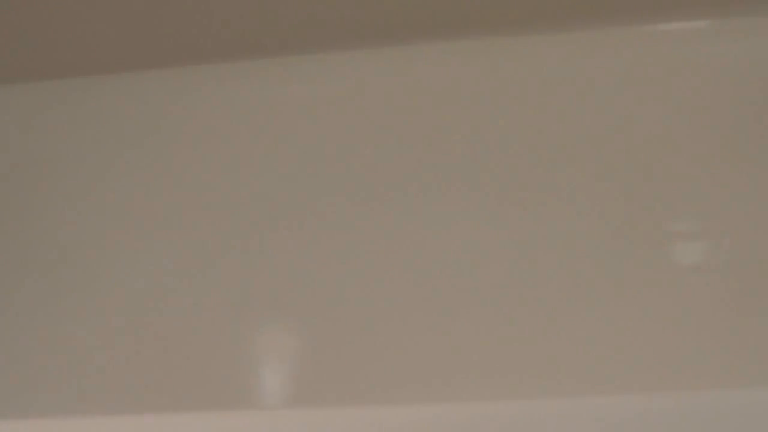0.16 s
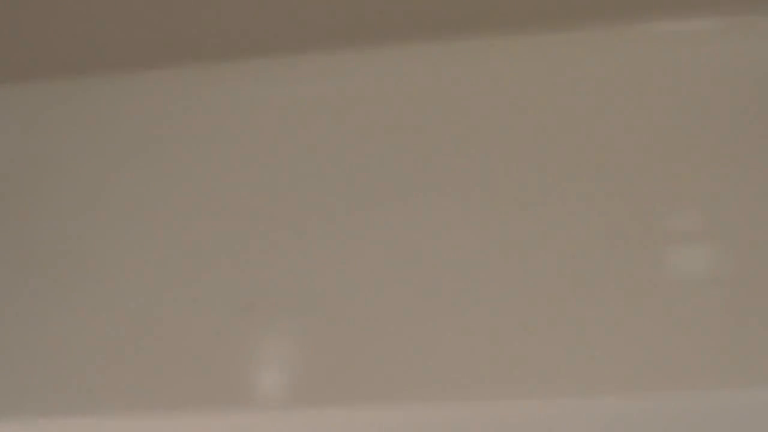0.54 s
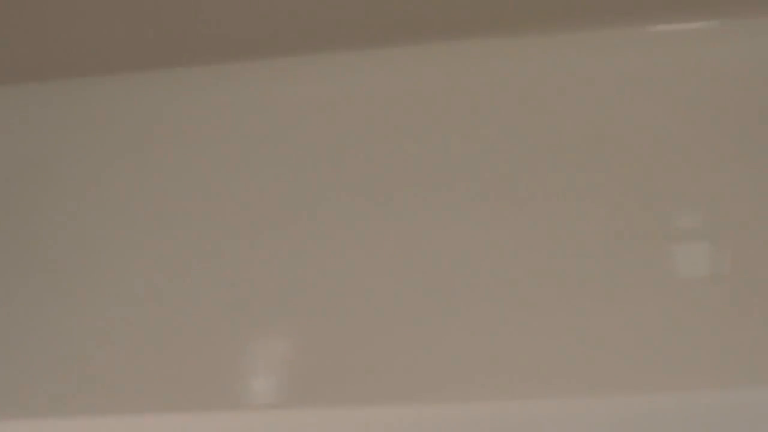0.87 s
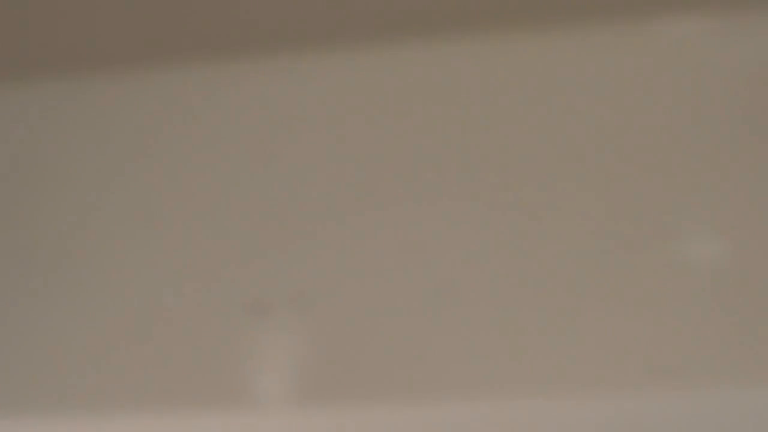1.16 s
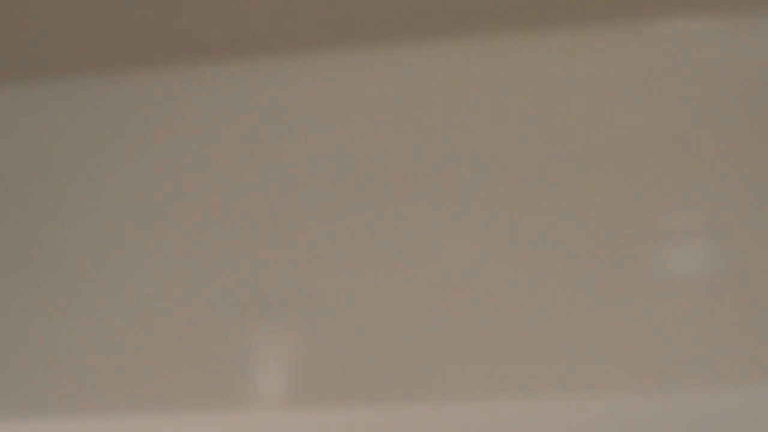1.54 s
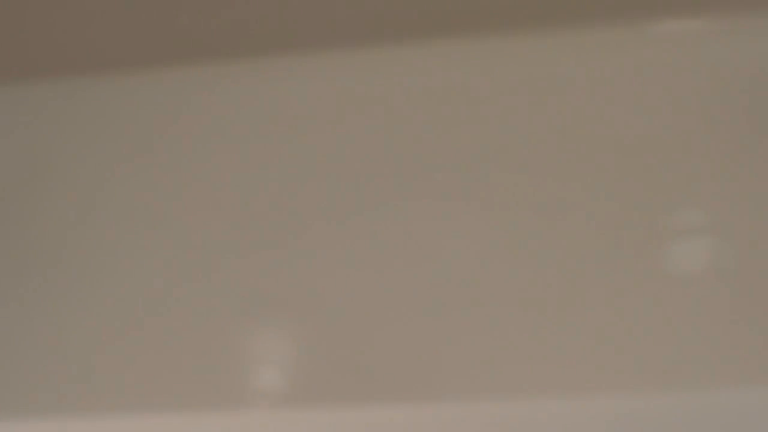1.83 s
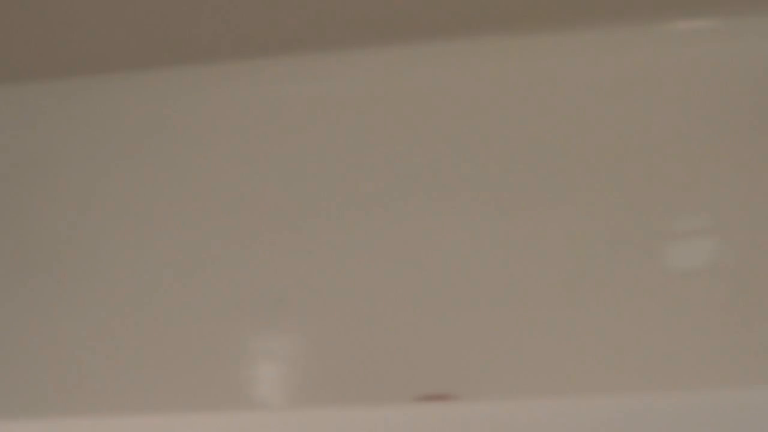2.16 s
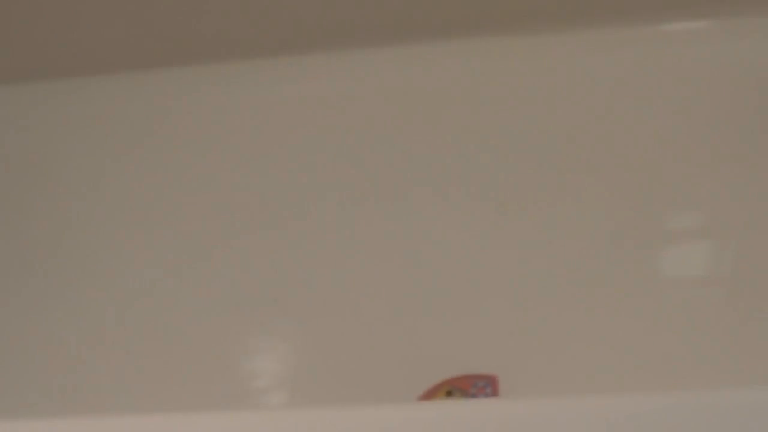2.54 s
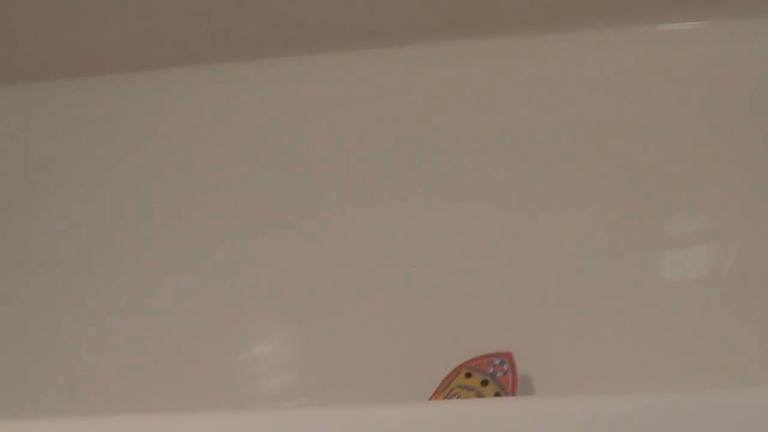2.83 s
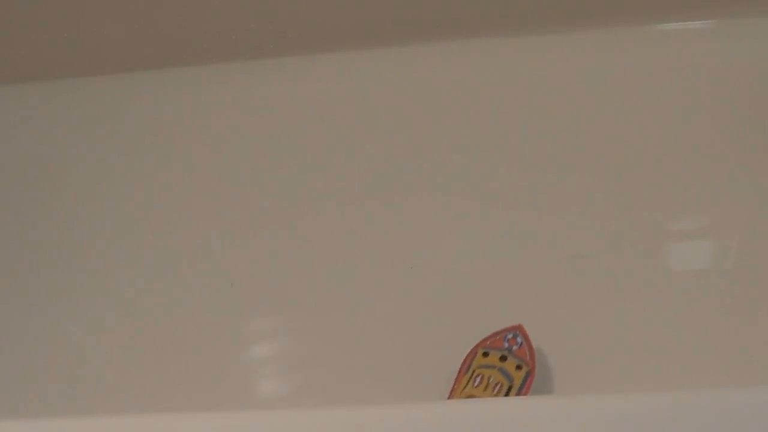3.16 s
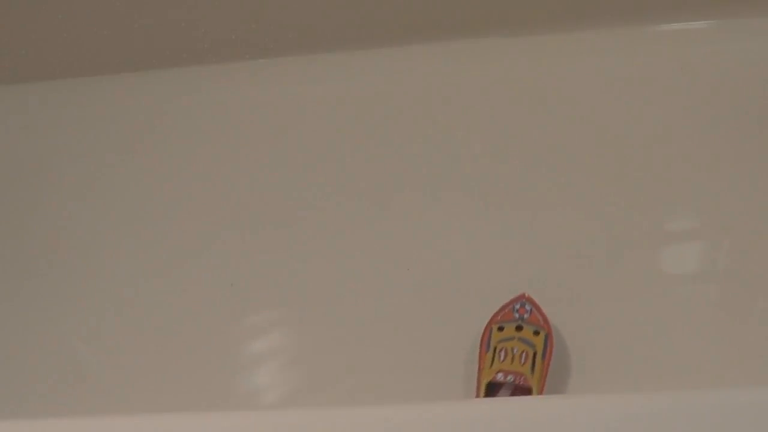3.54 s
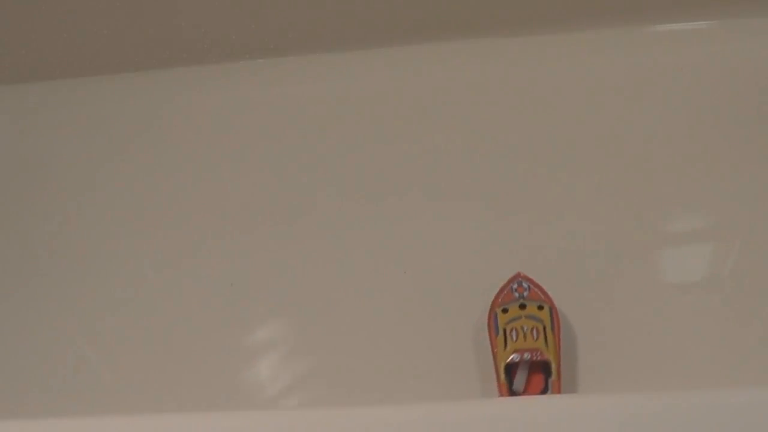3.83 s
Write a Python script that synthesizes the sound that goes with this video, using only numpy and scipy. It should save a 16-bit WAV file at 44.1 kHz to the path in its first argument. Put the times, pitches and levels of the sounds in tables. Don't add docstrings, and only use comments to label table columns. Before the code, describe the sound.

A candle-heated tin toy boat putters with a rapid, even metallic rattle, with occasional harder snaps, in an enamel bathtub. A small tiled room adds short reverberation, low hum, soft hiss and a faint high whine.

```python
import sys
import numpy as np
from scipy import signal
from scipy.fft import rfft, irfft
from scipy.io import wavfile
from scipy.ndimage import uniform_filter1d

SR = 44100
rng = np.random.default_rng(int(sys.argv[2]) if len(sys.argv) > 2 else 0)


def inscribe(sig):
    pcm = np.round(np.clip(np.atleast_2d(sig).T, -1, 1) * 32767)
    wavfile.write(sys.argv[1], SR, pcm.astype(np.int16))


def gain_from_decibels(decibels):
    exponent = np.asarray(decibels, float) / 20
    return 10 ** exponent


N = 176400


def evened(x):
    return x / np.sqrt(np.mean(x ** 2) + 1e-20)


def read(points, hz):
    f, value = np.transpose(points)
    return np.interp(np.log(hz + 1), np.log(f + 1), value)


def colour(x, points):
    hz = np.fft.rfftfreq(len(x), 1 / SR)
    return irfft(rfft(x) * gain_from_decibels(read(points, hz)), len(x))


def add(mix, s, sound):
    at = round(s * SR)
    sound = sound[max(-at, 0):]
    part = mix[max(at, 0):][:len(sound)]
    part += sound[:len(part)]


def knock(t, fall_s):
    rise_s = .0022
    t = np.maximum(t, 0)
    return (1 - np.exp(-t / rise_s)) * np.exp(-t / fall_s)


# f/Hz, level/dB
WHINE_TONES = [(15734.3, -57), (15747.3, -63), (15674.3, -76), (15614.4, -78), (15554.5, -79),
               (15494.5, -80), (15434.6, -80)]


def electric_whine():
    pan_db = .35
    t = np.arange(N) / SR
    tones = sum(gain_from_decibels(db + 1.5) * np.sin(2 * np.pi * hz * t + 3.3 * (hz > 15740))
                for hz, db in WHINE_TONES)
    return tones * gain_from_decibels(pan_db * np.array([[1], [-1]]))


# f/Hz, level/dB (per Hz)
AIR_SPECTRUM = [(20, -4), (60, -12), (250, -3.5), (600, -3.5), (1200, -0.5), (3000, -12), (8000, -22),
                (15500, -30)]
# f/Hz, likeness (-1 to 1)
AIR_COHERENCE = [(60, 0.94), (180, 0.62), (550, 0.47), (1650, 0.88), (4970, 0.43), (15000, 1)]


def air():
    level_db, patch_db = -39, 1.5
    frames, hz = N // 256 + 5, np.fft.rfftfreq(1024, 1 / SR)
    a, b, c, d, patches = rng.standard_normal((frames, 513, 5)).T
    patches = uniform_filter1d(patches, size=12, axis=0)
    patches = evened(uniform_filter1d(patches, size=14, axis=1))
    same = np.clip(read(AIR_COHERENCE, hz), -1, 1)[:, None]
    left = a + 1j * b
    right = same * left + np.sqrt(1 - same ** 2) * (c + 1j * d)
    z = np.array([left, right]) * gain_from_decibels(read(AIR_SPECTRUM, hz)[:, None] + patch_db * patches)
    noise = signal.istft(z, nperseg=1024, noverlap=768)[1][:, :N]
    return gain_from_decibels(level_db) * evened(noise)


# f/Hz, t60/s
ROOM_DECAY = [(300, .3), (1500, .24), (5000, .3), (12000, .2)]


def walls(x):
    same = .5
    taps = rng.standard_normal((3, SR // 3)) * (np.arange(SR // 3) > 200)
    hz, t, z = signal.stft(taps, SR, nperseg=256)
    decay = gain_from_decibels(-60 * t / read(ROOM_DECAY, hz)[:, None])
    tail = signal.istft(z * decay, SR, nperseg=256)[1]
    tail = np.sqrt(same) * tail[0] + np.sqrt(1 - same) * tail[1:]
    return signal.fftconvolve(x[None], tail / np.linalg.norm(tail[0]), axes=1)[:, :N]


def room(x):
    turns_per_s = 0.3474
    turns = turns_per_s * np.arange(N) / SR
    return sum(walls(x * np.sqrt(2 / 3) * np.cos(2 * np.pi * (turns + k / 3))) for k in range(3))


# f/Hz, level/dB
SIZZLE_SPECTRUM = [(1500, -3), (4000, -9), (8000, -6), (12000, -9), (15000, -14)]


def flame_sizzle():
    middle_s, half_width_s, level_db = 1.916, .1, -47.5
    swell = np.exp(-((np.arange(N) / SR - middle_s) / half_width_s) ** 2)
    return gain_from_decibels(level_db) * swell * evened(colour(rng.standard_normal(N), SIZZLE_SPECTRUM))


# f/Hz, level/dB
BUMP_SPECTRUM = [(150, -20), (280, 4), (400, 2.5), (650, 1.5), (900, -35)]


def hull_bump():
    start_s, length_s, level_db = 1.578, 0.033, -33.5
    out, t = np.zeros(N), np.arange(8192) / SR
    swell = np.clip(t / .006, 0, 1) / (1 + (t / length_s) ** 6)
    thud = evened(colour(rng.standard_normal(len(t)), BUMP_SPECTRUM))
    add(out, start_s, gain_from_decibels(level_db) * swell * thud)
    return out


def drop_tick():
    start_s, level_db, hz, t60_s, click_fall_s = 2.4488, -24, 6200, .006, .00034
    out, t = np.zeros(N), np.arange(8192) / SR
    click = .5 * rng.standard_normal(len(t)) * np.exp(-t / click_fall_s)
    tone = np.sin(2 * np.pi * hz * t)
    add(out, start_s, gain_from_decibels(level_db - 60 * t / t60_s) * (tone + click))
    return out


# f/Hz, level/dB
CRACK_SPECTRUM = [(700, -19), (1700, 6.5), (2500, -6.5), (3700, -16), (5000, -9), (7200, -16.5),
                  (10000, -22), (13500, -31)]


def crack():
    fall_s, grain_db, lump_db = 0.02, 2, 2
    noise, grain, lumps = rng.standard_normal((3, 8192))
    lumps = gain_from_decibels(lump_db * evened(uniform_filter1d(lumps[:4097], size=70)))
    grain = gain_from_decibels(grain_db * evened(uniform_filter1d(grain, size=80)))
    sound = evened(irfft(rfft(colour(noise, CRACK_SPECTRUM)) * lumps))
    return knock(np.arange(8192) / SR, fall_s) * sound * grain


# t/s, level/dB
HARD_SNAPS = [
    (0.4245, -21),
    (1.0615, -21),
    (1.1559, -20),
    (1.4664, -29),
    (2.2034, -29.5),
    (2.6264, -18.5),
    (3.1502, -23.5),
    (3.2505, -22),
    (3.4605, -29),
]


def hard_snaps():
    out = np.zeros(N)
    for s, db in HARD_SNAPS:
        add(out, s, gain_from_decibels(db - 4.5) * crack())
    return out


PLACES_S = [.8, 2.4, 3.6]


def ring(push, starts, modes):
    fresh, fresh_per_khz = .05, .25
    drift_rad, detune = .35, .005
    t, out = np.arange(N) / SR, np.zeros(N)
    cycle = np.clip(np.searchsorted(starts, t) - 1, 0, len(starts) - 1)
    for hz, t60, *place_db in modes:
        step, tune = rng.standard_normal((len(starts), 2)).T
        phase = 2 * np.pi * rng.random() + drift_rad * np.cumsum(step)
        mode_hz = hz * (1 + detune * tune[cycle])
        turn = 2 * np.pi * mode_hz * (t - starts[cycle]) + phase[cycle]
        a, b = uniform_filter1d(rng.standard_normal((N, 2)), size=round(160000 / hz), axis=0).T
        flutter = 1 + (fresh + fresh_per_khz * hz / 1000) * (evened(a) + 1j * evened(b))
        drive = push * gain_from_decibels(np.interp(t, PLACES_S, place_db)) * np.exp(1j * turn) * flutter
        r = 10 ** (-3 / (max(t60, .005) * SR))
        smooth = signal.lfilter([np.sqrt(1 - r)], [1, -r * np.exp(2j * np.pi * hz / SR)], drive)
        out += signal.lfilter([1 - r], [1, -r * np.exp(2j * np.pi * hz / SR)], smooth).real
    return evened(out)


# t/s, snap lag/ms, level/dB (strength), level/dB (brightness)
BOILER_COURSE = [(0, -15.5, -0.5, -23), (0.332, -0.5, -3, -5.5), (0.539, -5, -1, -2),
                 (0.961, 3, -0.5, -2.5), (1.059, 2, 1.5, -4), (1.172, -9.5, 2, 0.5),
                 (1.27, -11, -0.5, -0.5), (1.802, -1, -2.5, 1), (2.11, -2, -2, -1), (2.532, 2.4, 0, 1.5),
                 (2.741, -8, 0, 0.5), (3.048, 0.5, 0, -1.5), (3.261, -10.5, 0, 1.5), (3.58, -8.5, 1.5, 0),
                 (3.682, -6, -0.5, 0), (3.891, .7, 0, -5), (4, 4, 0, 5.5)]
# t/ms after the snap, level/dB far, level/dB under rim, level/dB open
CYCLE_KNOCKS = [(-50, -14, -15, -13), (-42, -7, -10, -5), (-34, -12, -7, -10), (-13, -4, -1, -3),
                (-7, -3, 0, -3), (-2, 0, 0, 1), (3, -2, -2, -4), (9, -2, -8, -6), (16, -2, -12, -7),
                (25, -5, -12, -14), (37, -14, -13, -14)]


def lid_pushes():
    period_s, first_s = .10472, .0136
    knock_fall_s, body_lead_s = .0022, 0.0028
    snap_fall_s, early_db, early_s = 0.0062, -2, 0.0104
    lead, size = 2400, 5600
    t = (np.arange(size) - lead) / SR
    s, lag_ms, db, bright_db = np.transpose(BOILER_COURSE)
    beats = first_s + np.arange(40) * period_s
    starts = beats + np.interp(beats, s, lag_ms) / 1000 - lead / SR
    body, lid = np.zeros((2, N))
    snap = knock(t, snap_fall_s) + gain_from_decibels(early_db) * knock(t + early_s, snap_fall_s)
    for at, start in zip(beats, starts):
        rattle = sum(gain_from_decibels(np.interp(at, PLACES_S, place_db)) * knock(t - ms / 1000, knock_fall_s)
                     for ms, *place_db in CYCLE_KNOCKS)
        add(body, start - body_lead_s, rattle * gain_from_decibels(np.interp(at, s, db)))
        add(lid, start, snap * gain_from_decibels(np.interp(at, s, db + bright_db)))
    return starts, body, lid


# f/Hz, t60/s, level/dB far, level/dB under rim, level/dB open
HULL_MODES = [(1036.7, 0.28, -22.5, -18, -14.5), (1097, 0.015, -4, -10, -9.5), (1228, 0.013, -10, -3, -20),
              (1309.7, 0.017, 0, -13, 8), (1356, 0.046, -3.5, -14, -0.5), (1426, 0.012, -2.5, 3.5, 1.5),
              (1574.4, 0.019, -7.5, -1, -6), (1638, 0.024, -11.5, -5, -7), (1745, 0.02, -3.5, -16, -14),
              (1870.4, 0.039, -10, -14.5, -9), (2087, 0.0067, -8.5, -5, -11),
              (2288, 0.049, -19.5, -14, -17), (2457, 0.017, -17, -9.5, -12.5),
              (892, 0.0067, -14.5, -9, -14.5)]
# f/Hz, t60/s, level/dB far, level/dB under rim, level/dB open
LID_MODES = [(626, 0.059, -7, -14, -24), (731, 0.02, 3, -5.5, -12.5), (2932, 0.0045, -16, -19, -16),
             (3671, 0.004, -4, -5.5, -3), (4270, 0.0052, -11, -21, -15), (5010, 0.002, -3.5, -7.5, -5.5),
             (5750, 0.0089, -31, -24, -23)]
# f/Hz, level/dB
SPRAY_SPECTRUM = [(1500, -1), (3000, 4), (6000, -5), (9000, -3.5), (14000, -41)]


def boiler():
    spray_db, hull_db, lid_db = -56, -31, -47
    starts, body, lid = lid_pushes()
    spray = evened(lid * colour(rng.standard_normal(N), SPRAY_SPECTRUM))
    hull = gain_from_decibels(hull_db) * ring(body, starts, HULL_MODES)
    return gain_from_decibels(spray_db) * spray + hull + gain_from_decibels(lid_db) * ring(lid, starts, LID_MODES)


def scene():
    reverb_db = -4.5
    boat = boiler() + hard_snaps() + drop_tick() + hull_bump() + flame_sizzle()
    return boat + gain_from_decibels(reverb_db) * room(boat) + air()


def band_limit(x):
    return signal.sosfilt(signal.butter(12, 16340, fs=SR, output="sos"), x)


def record(dry):
    edge_hz = 15790
    edge = signal.firwin(1023, edge_hz, window=("kaiser", 9), fs=SR)[None]
    mix = signal.oaconvolve(dry, edge, "same") + electric_whine()
    return band_limit(mix)


dry = scene()
out = record(dry)
inscribe(out)
```